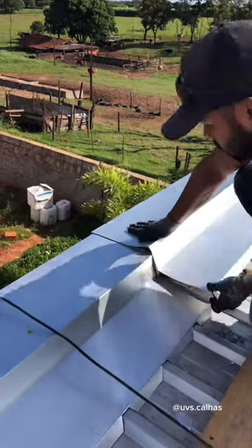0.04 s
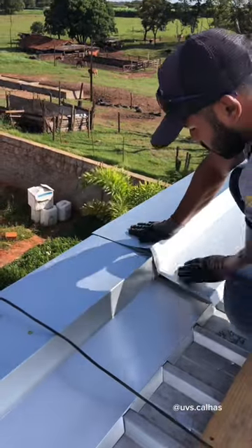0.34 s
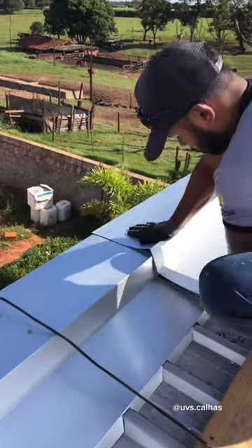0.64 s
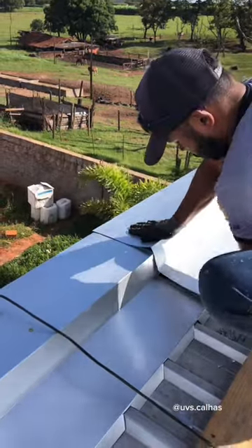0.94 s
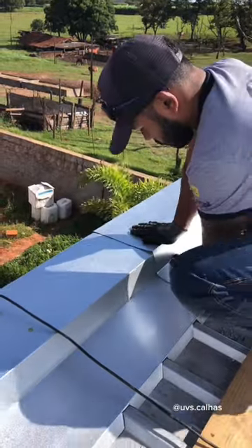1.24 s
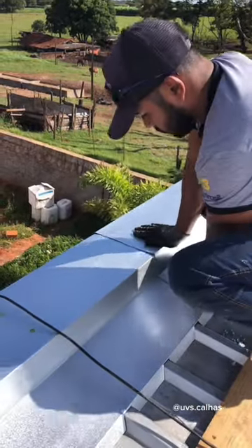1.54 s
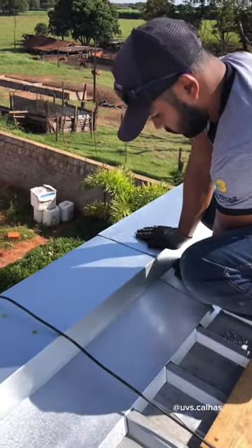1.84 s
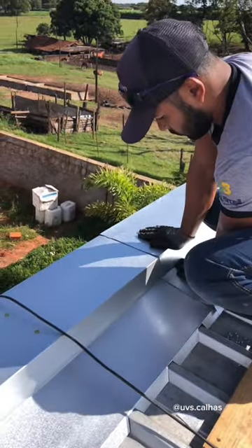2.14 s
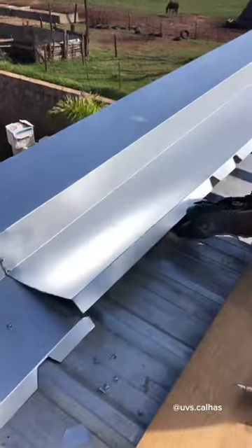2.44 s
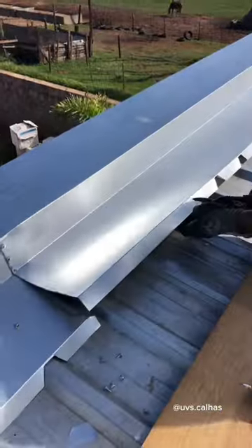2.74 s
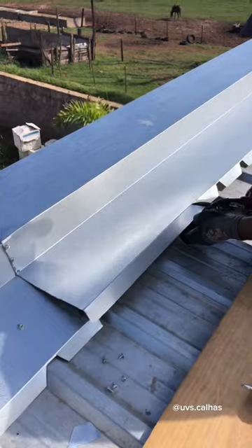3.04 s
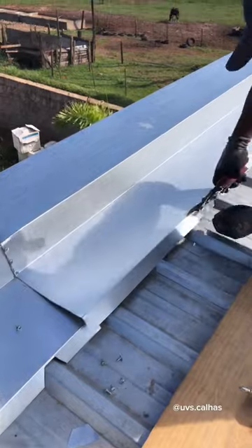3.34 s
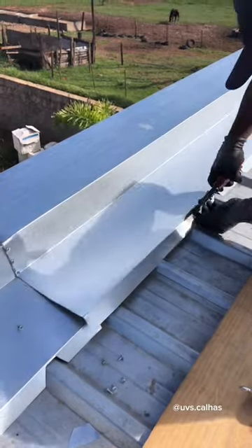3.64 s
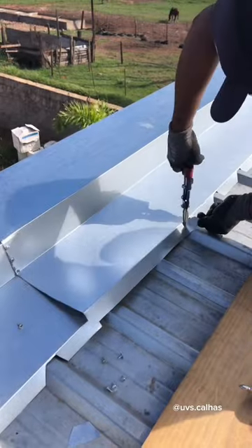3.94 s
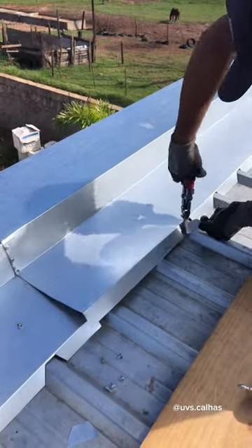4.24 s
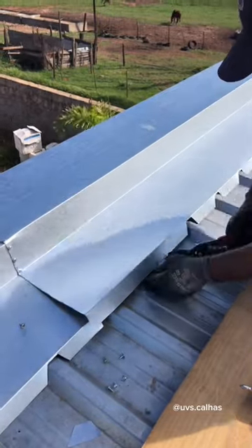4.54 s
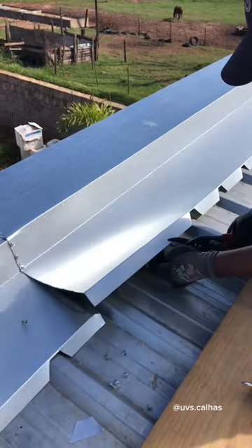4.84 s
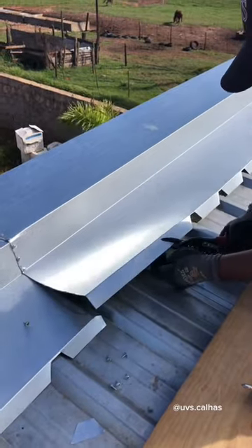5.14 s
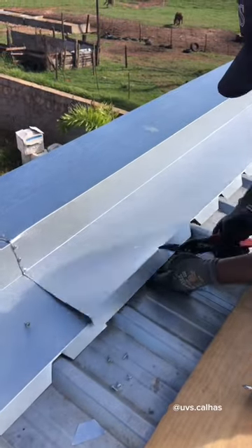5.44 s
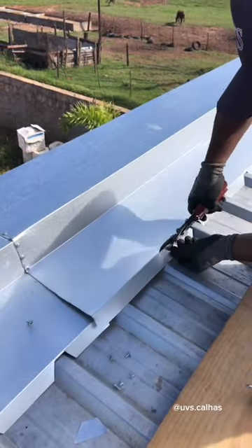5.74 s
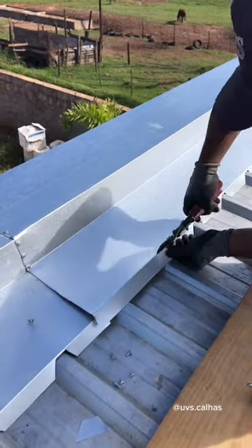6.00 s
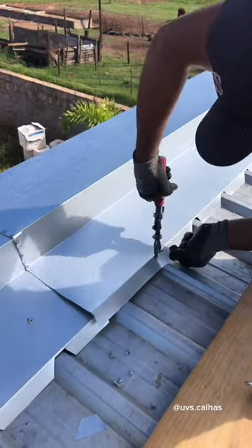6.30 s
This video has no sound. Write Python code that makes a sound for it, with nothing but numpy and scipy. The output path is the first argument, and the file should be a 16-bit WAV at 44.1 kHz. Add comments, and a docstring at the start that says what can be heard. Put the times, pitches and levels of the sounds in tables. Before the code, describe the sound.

On an open roof, thin steel flashing is pressed into place. It scrapes softly, lands with a metallic chatter, then wobbles and pops. After a brief dip in level, tin snips cut in runs of short strokes, steel sliding on steel with occasional bright crunches and snaps. The snips jingle once, the sheet pops loudly, and cutting continues. A light breeze touches the nearby microphone.

```python
"""On a roof in the open air, a light breeze on the microphone: thin steel flashing is fitted and trimmed.
First the sheet is pressed into place; it lands with a chatter, wobbles and pops as its dents spring over.
Just after two seconds the level dips briefly. Then tin snips cut in runs of short strokes, steel sliding
on steel, and now and then the metal gives with a bright crunch or a snap. The loose snips jingle once,
the sheet pops at its loudest, and the cutting and handling go on."""
import sys
import numpy as np
from scipy import signal
from scipy.io import wavfile
from scipy.ndimage import uniform_filter1d

SR = 44100
rng = np.random.default_rng(int(sys.argv[2]) if len(sys.argv) > 2 else 0)


def wrap_up_sound(samples):
    """Save the sound to the file named by the first command line argument, as 16-bit audio."""
    columns = np.atleast_2d(samples).T
    # keep every value between -1 and 1, then stretch to whole-number steps
    tamed = np.clip(columns, -1, 1)
    steps = np.round(tamed * 32767).astype(np.int16)
    wavfile.write(sys.argv[1], SR, steps)


N = 289548
TIME = np.arange(N) / SR


def amp(db):
    """Decibels as a gain."""
    return 10 ** (np.asarray(db) / 20)


def unit(x):
    """Scales to energy 1."""
    return x / np.sqrt(np.sum(x ** 2) + 1e-20)


def curve(rows):
    """Points of (t/s, level/dB) as a gain for every sample."""
    return amp(np.interp(TIME, *np.transpose(rows)))


def add(mix, s, sound):
    """Mixes a sound in at time s."""
    part = mix[max(round(s * SR), 0):][:len(sound)]
    part += sound[:len(part)]


def through(x, response):
    """Convolves with an impulse response."""
    return signal.oaconvolve(x, response)[:N]


def colour(points, size=4096):
    """Minimum-phase impulse response of energy 1 with the spectrum (f/Hz, level/dB)."""
    hz, db = np.transpose(points)
    bin_hz = abs(np.fft.fftfreq(size, 1 / SR)) + 1
    log_gain = np.log(amp(np.interp(np.log(bin_hz), np.log(hz), db)))
    spectrum = np.exp(np.conj(signal.hilbert(log_gain)))
    return unit(np.fft.ifft(spectrum).real[:size // 2])


def ringing(modes):
    """Impulse response of resonances (f/Hz, width/Hz, level/dB), energy 1."""
    t = TIME[:SR // 3]
    return unit(sum(amp(db) * width * np.exp(-np.pi * width * t) * np.sin(2 * np.pi * hz * t)
                    for hz, width, db in modes))


def swell(rise, t60, start_db=-26, sag=0.84):
    """Force builds up, then dies away; with sag above 1 the decay speeds up as it goes."""
    t = TIME[:SR // 2]
    attack_db = start_db * np.maximum(1 - t / rise, 0)
    decay_db = -60 * (np.maximum(t - rise, 0) / t60) ** sag
    return amp(attack_db + decay_db)


def slips(length, per_s, spread_db, smooth):
    """Tiny slips and fractures of uneven size over smooth friction noise, rms 1."""
    size = amp(spread_db * np.minimum(rng.exponential(1, length), 4))
    clicks = size * rng.choice([-1, 1], length) * (rng.random(length) < per_s / SR)
    friction = smooth * unit(rng.standard_normal(length))
    return np.sqrt(length) * unit(unit(clicks) + friction)


def sheet_tail(x, t60, wet_db):
    """Waves bounce between the edges of the sheet and add a dense metallic tail."""
    t = TIME[:SR // 2]
    tail = rng.standard_normal(len(t)) * amp(-60 * t / t60) * (t > .001)
    return (x + amp(wet_db) * through(x, unit(tail))) / np.hypot(1, amp(wet_db))


def outdoors():
    """Far hiss of open country, and a light breeze on the microphone."""
    # spectrum of the distant air: f/Hz, level/dB
    air = [(20, -16), (60, -12), (150, -0.5), (500, -7.5), (1000, -9.5), (2500, -22.5), (5000, -24),
           (10000, -31.5), (15000, -36.5)]
    # strength of the breeze: t/s, level/dB
    breeze = [(0, -91), (.7, -57), (1.25, -53), (1.55, -64.5), (2.2, -57), (2.26, -77.5), (4.5, -79.5),
              (6.15, -75), (6.5, -61)]
    buffeting = [(15, -4), (45, -8.5), (100, -3.5), (250, -42), (1000, -67)]  # f/Hz, level/dB
    gusts = through(rng.standard_normal(N), colour(buffeting))
    hiss = through(rng.standard_normal(N), colour(air))
    return amp(-74) * hiss + curve(breeze) * gusts


def handling(firm_db=-47, wobble_growth=1.23):
    """Knees and gloves shift on the roof in soft bumps; firmer handling keeps the sheet wobbling."""
    # how hard the sheet is handled: t/s, level/dB
    pressure = [(0, -60.5), (.48, -62.5), (.8, -53.5), (1.22, -47.5), (1.52, -63), (1.88, -51.5),
                (2.04, -72.5), (2.22, -53), (2.32, -74.5), (2.75, -65), (3.7, -70), (4.48, -66.5),
                (4.63, -74), (4.8, -52), (5.12, -63), (5.7, -48.5), (6.14, -64), (6.36, -50), (6.57, -61)]
    # spectrum of the bumps: f/Hz, level/dB
    bump_spectrum = [(20, -28), (60, -15), (140, 3.5), (300, -3.5), (600, -23.5), (1200, -36.5),
                     (3000, -40.5), (16000, -64)]
    # spectrum of the wobbling sheet: f/Hz, level/dB
    wobble_spectrum = [(60, -24.5), (200, -4), (420, -6), (750, -7), (1500, -35), (5000, -67.5)]
    effort = curve(pressure)
    bumps = through(slips(N, per_s=130, spread_db=4.0, smooth=1.0), colour(bump_spectrum))
    wobble = through(slips(N, per_s=90, spread_db=1, smooth=0.31), colour(wobble_spectrum))
    return amp(2) * effort * bumps + amp(-55.5) * (effort / amp(firm_db)) ** wobble_growth * wobble


def squeaks(width_hz=1500):
    """Soft, rough whistles: rubbing noise passed twice through one wide resonance."""
    # faint squeaks: t/s, length/s, level/dB, f/Hz
    rubs = [(1.542, 0.035, -62, 5230), (1.76, 0.052, -71, 5350), (2.025, .038, -80, 4940),
            (2.068, 0.022, -70, 4700), (2.09, 0.049, -75, 4100), (5.991, 0.027, -66, 2890),
            (6.108, 0.092, -77, 4330)]
    out = np.zeros(N)
    for s, length, db, hz in rubs:
        force = signal.windows.hann(int(length * SR))
        rub = force * rng.standard_normal(len(force))
        ring = ringing([(hz, width_hz, 0)])
        add(out, s, amp(db) * through(rub, unit(through(ring, ring))))
    return out


def clinks(t60=0.064, uneven_db=4):
    """The hard steel of the snips rings, with another mix of modes at each touch."""
    # the open snips clink: t/s, level/dB
    touches = [(4.444, -80), (4.507, -63), (4.519, -56), (4.562, -58)]
    # modes of the snips: f/Hz, level/dB
    modes = [(2735, -77.5), (3962, -80), (5050, -78), (5900, -85), (6455, -78), (7171, -90), (8969, -99),
             (9991, -99), (10675, -101), (11515, -90.5), (14416, -101), (15531, -102)]
    out, t = np.zeros(N), TIME[:SR // 3]
    hz, mode_db = np.transpose(modes)
    partials = np.sin(2 * np.pi * np.outer(hz, t)) * amp(-60 * t / t60)
    for s, db in touches:
        weights = unit(amp(mode_db + uneven_db * rng.standard_normal(len(hz))))
        add(out, s, amp(db) * (weights @ partials))
    return out


def clangs(rise_s=0.0016):
    """Dying chatter rings the folded edge of the flashing."""
    # the flashing lands on the roof: t/s, t60/s, level/dB
    landings = [(0.826, 0.71, -39), (1.001, 0.022, -28.5)]
    # modes of the folded edge: f/Hz, width/Hz, level/dB
    fold = [(800, 105, 3), (897, 130, -1), (1014, 58, 1), (1220, 49, -13), (1640, 170, -7.5),
            (1900, 99, -9), (2340, 98, -27)]
    out = np.zeros(N)
    for s, t60, db in landings:
        force = swell(rise_s, t60)
        ring = through(force * rng.standard_normal(len(force)), ringing(fold))
        add(out, s, amp(db) * np.linalg.norm(force) * unit(ring))
    return out


def flexes(lowest_share=0.27):
    """Bending sets off a jumble of low waves; each bend has its own strength and pitch."""
    # the sheet bends: t/s, level/dB, f/Hz of the highest strong wave
    bends = [(0.144, -55, 232), (0.351, -47, 203), (.585, -44.5, 286), (.643, -48, 434), (.805, -56, 990),
             (1.066, -40.5, 577), (1.118, -30.5, 460), (1.398, -52, 414), (1.791, -44.5, 320),
             (1.885, -37.5, 255), (2.168, -56, 220), (2.718, -46, 367), (3.108, -50, 264),
             (3.172, -45.5, 338), (3.238, -45.5, 750), (3.29, -50.5, 290), (3.706, -56.5, 394),
             (3.783, -60.5, 234), (4.652, -29.5, 464), (4.699, -28.5, 677), (4.727, -44.5, 1150),
             (4.754, -32.5, 380), (5.389, -39.5, 208), (5.412, -45, 382), (5.565, -37, 480),
             (5.668, -39, 326), (5.723, -42, 202), (5.766, -40, 394), (5.921, -44, 197),
             (6.434, -44.5, 404), (6.475, -39.5, 740)]
    out, force = np.zeros(N), swell(rise=0.028, t60=0.15, start_db=-10, sag=1.087)
    for s, db, top_hz in bends:
        lowpass = signal.butter(3, top_hz, fs=SR, output="sos")
        highpass = signal.butter(2, top_hz * lowest_share, "high", fs=SR, output="sos")
        waves = signal.sosfilt(highpass, signal.sosfilt(lowpass, rng.standard_normal(len(force))))
        add(out, s, amp(db) * np.linalg.norm(force) * unit(waves * force))
    return out


def pops(rise_cycles=0.63, hold_s=0.0014, glide_cycles=6):
    """A few cycles that fall in pitch, since short bending waves travel fastest."""
    # a dent springs over or the sheet knocks on the roof: t/s, level/dB, starting f/Hz
    dents = [(1, -32.5, 2780), (1.009, -39, 435), (1.085, -29, 424), (1.24, -35, 197), (1.392, -35.5, 120),
             (1.139, -68, 517), (1.156, -25, 202), (1.734, -32.5, 252), (1.901, -33, 209),
             (2.083, -29.5, 137), (2.16, -61, 2770), (3.19, -41, 198), (3.256, -36.5, 647),
             (3.417, -44, 3250), (3.425, -39.5, 256), (3.807, -48, 224), (4.444, -44, 2700),
             (4.512, -43, 160), (4.561, -44, 153), (4.671, -25, 287), (4.7058, -15, 760), (4.757, -23, 800),
             (4.7621, -34.5, 2300), (4.778, -32.5, 356), (5.58, -34.5, 270), (5.784, -37, 386),
             (5.997, -50.5, 2930), (6.336, -33.5, 168), (6.499, -27.5, 222)]
    out, t = np.zeros(N), TIME[:SR // 8]
    for s, db, hz in dents:
        age = t / (rise_cycles / hz + hold_s)  # 1 at the envelope's peak
        phase = 2 * np.pi * glide_cycles * np.log1p(t * hz / glide_cycles)
        add(out, s, amp(db) * age ** 2 * np.exp(2 - 2 * age) * np.sin(phase))
    return out


def panel(bending):
    """Everything that bends the flashing also wakes its broad resonances."""
    # modes of the whole flashing: f/Hz, width/Hz, level/dB
    modes = [(141.5, 19, 0.5), (219, 11, -2.5), (351, 45, -2), (439, 25, 8.5), (537, 30, 8), (654, 15, -19),
             (804, 26, 10.5)]
    direct = sheet_tail(bending, t60=0.09, wet_db=-24.5)
    return amp(-3.0) * direct + amp(-33.5) * through(bending, ringing(modes))


def spot_echoes(x, t60=0.018, wet_db=-4):
    """Each spot of the sheet adds its own brief cluster of reflections."""
    t = TIME[:SR // 40]
    echoes = amp(wet_db) * unit(rng.standard_normal(len(t)) * amp(-60 * t / t60))
    echoes[0] += 1  # the direct wave
    return through(x, unit(echoes))


def strip_ring(drive, detune=0.011, narrowing=0.4):
    """The strip at the blades rings; bent steel splits each resonance into four close, fine partials."""
    # modes of the strip before splitting: f/Hz, width/Hz, level/dB
    modes = [(1680, 34, -5.5), (1920, 125, 1.5), (2510, 50, -0.5), (3070, 440, -4), (3820, 83, -9),
             (4970, 140, -10), (5230, 130, -6), (5680, 110, -1.5), (6650, 220, -6), (7480, 310, -12),
             (8700, 150, -17.5), (9740, 270, -22), (11820, 590, -5)]
    partials = [(hz * (1 + detune * rng.standard_normal()), width * narrowing, db)
                for hz, width, db in modes for _ in range(4)]
    return through(drive, ringing(partials))


def judder(length, depth_db=0.5, clump_samples=130):
    """The blades stick and slip: a gain of rms 1 that wavers over a few milliseconds."""
    drift = uniform_filter1d(rng.standard_normal(length), clump_samples, mode="wrap")
    return np.sqrt(length) * unit(amp(depth_db * np.sqrt(clump_samples) * drift))


def contacts(usual_gap_s=0.11, usual_t60_s=0.21, slowest_gap_s=0.15, stretch=1.38):
    """Steel meets steel, slower strokes lasting longer: t/s, rise/s, t60/s, dull/dB, bright/dB."""
    # steel slides on steel, first the sheet's edges, then the blades: t/s, level/dB
    strokes = [(0, -61), (0.134, -57.5), (.222, -56.5), (.281, -58), (.42, -59.5), (.5, -60.5),
               (.815, -41.5), (0.994, -46.5), (1.144, -47), (1.455, -57), (1.607, -58.5), (1.761, -60.5),
               (1.893, -65), (2.314, -55), (2.343, -66.5), (2.393, -51), (2.456, -57.5), (2.562, -48.5),
               (2.675, -52.5), (2.777, -54), (2.878, -51.5), (3.352, -57), (3.515, -54), (3.573, -58.5),
               (3.713, -57.5), (3.765, -91), (3.861, -59.5), (3.908, -55.5), (3.985, -55.5), (4.035, -49.5),
               (4.13, -49), (4.242, -54.5), (4.288, -49), (4.498, -60), (4.885, -46), (4.986, -47),
               (5.085, -50.5), (5.189, -50), (5.293, -57), (5.664, -54.5), (5.773, -51), (5.825, -52.5),
               (5.873, -61), (5.992, -63), (6.124, -65), (6.248, -51), (6.268, -46.5), (6.325, -58.5),
               (6.39, -52), (6.496, -54)]
    # a stroke's treble against its dull scrape: t/s, level/dB
    grit = [(0, -13), (2.9, -11.5), (3.55, -23), (3.85, -21), (4, -17), (5.3, -16), (5.8, -21.5),
            (6.4, -16)]
    # the steel gives way, creased or sheared: t/s, t60/s, level/dB
    yields = [(1.228, 0.16, -58.5), (1.389, 0.19, -58), (2.93, 0.11, -47), (2.994, 0.14, -47.5),
              (3.085, 0.19, -55.5), (3.112, 0.14, -54.5), (3.193, 0.16, -48.5), (4.324, .12, -46),
              (5.486, .14, -45)]
    # an edge or the closing blades snap: t/s, dull knock/dB, bright crack/dB
    cracks = [(0.838, -57, -49), (1.342, -56, -51.5), (1.556, -77, -53), (2.983, -50.5, -38),
              (3.215, -52, -44.5), (3.417, -47.5, -69), (3.48, -45.5, -56), (4.344, -39.5, -37),
              (4.442, -45, -70), (4.759, -44.5, -68), (4.846, -47, -60), (5.673, -50.5, -65),
              (5.877, -46.5, -71), (5.998, -49.5, -73)]
    gaps = np.minimum(np.diff([s for s, db in strokes], append=np.inf), slowest_gap_s)
    t60s = usual_t60_s * (gaps / usual_gap_s) ** stretch
    slides = [(s, 0.012, t60, db, db + np.interp(s, *np.transpose(grit)))
              for (s, db), t60 in zip(strokes, t60s)]
    crunches = [(s, 0.014, t60, db - 13.5, db) for s, t60, db in yields]
    snaps = [(s, 0.003, 0.037, dull_db, bright_db) for s, dull_db, bright_db in cracks]
    return slides + crunches + snaps


def steel_on_steel(crack_db=16, sudden_s=0.003):
    """Each contact is a shower of slips: dull through the panel, bright at the edge and its strip."""
    # spectrum of the scrape through the panel: f/Hz, level/dB
    dull_spectrum = [(30, -27.5), (80, -21), (140, 4.5), (350, 2), (800, -3), (2000, -14), (4000, -20.5),
                     (16000, -87.5)]
    # spectrum of the crunch at the edge: f/Hz, level/dB
    bright_spectrum = [(200, -50), (700, -4.5), (1800, 1), (2700, -3.5), (3500, 1.5), (5200, 1),
                       (8000, 0.5), (11500, -6.5), (13000, -6), (16000, -12.5)]
    # how freely the strip rings: t/s, level/dB
    strip_freedom = [(0, -47), (2.85, -8), (2.95, -7.5), (3.3, -13), (5.5, -11.5)]
    dull, bright = np.zeros((2, N))
    for s, rise, t60, dull_db, bright_db in contacts():
        force = swell(rise, t60, start_db=-15.5, sag=1.155)
        grip = judder(len(force))
        scrape = force * slips(len(force), per_s=1300, spread_db=-0.5, smooth=0.58)
        crunch = force * grip * slips(len(force), per_s=3000, spread_db=7.0, smooth=0.83)
        add(crunch, rise, [amp(crack_db) * np.exp(-rise / sudden_s)])  # a sudden break peaks in a crack
        add(dull, s, amp(dull_db) * scrape)
        add(bright, s, amp(bright_db) * spot_echoes(crunch))
    free = curve(strip_freedom)
    body = through(dull, colour(dull_spectrum))
    edge = through(bright, colour(bright_spectrum)) / np.hypot(1, free)  # the strip takes its share
    strip = strip_ring(edge * free)
    sheet = sheet_tail(body, t60=0.74, wet_db=-9.5) + sheet_tail(edge, t60=0.24, wet_db=-11)
    return sheet + amp(3.0) * strip


def dip(start_s=2.252, length_s=0.033, depth_db=-47):
    """The level drops suddenly and quickly comes back."""
    age = (TIME - start_s) / length_s
    return amp(depth_db * (age > 0) * np.maximum(1 - age ** 2, 0))


def scene():
    """The bending sheet, the working steel and the open air, at one microphone."""
    sheet = panel(flexes() + pops() + handling())
    steel = amp(-0.5) * steel_on_steel() + clangs() + squeaks() + amp(-1.5) * clinks()
    return (dip() * (sheet + steel + outdoors()))[None]


def record(dry):
    """The recorder's band ends at 15.9 kHz."""
    lowpass = signal.firwin(511, 15900, window=("kaiser", 9), fs=SR)
    return signal.oaconvolve(dry, lowpass[None], "same")


dry = scene()
out = record(dry)
wrap_up_sound(out)
```